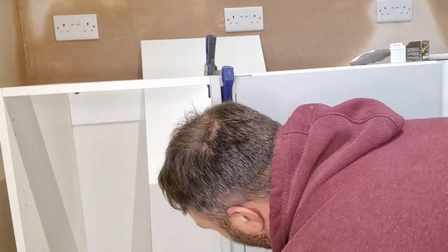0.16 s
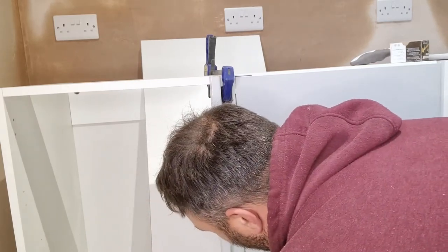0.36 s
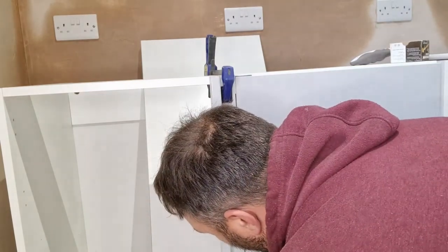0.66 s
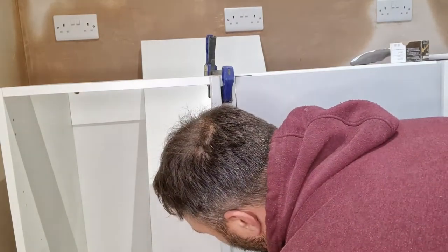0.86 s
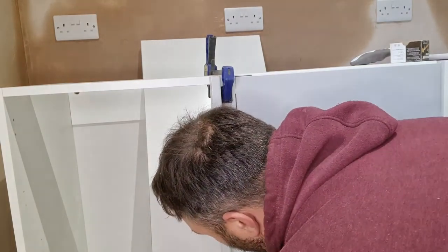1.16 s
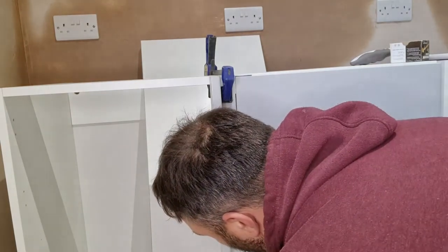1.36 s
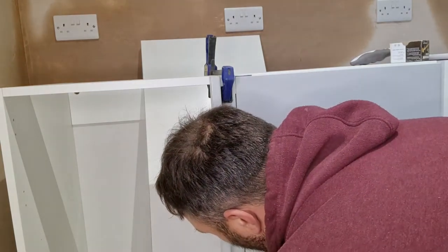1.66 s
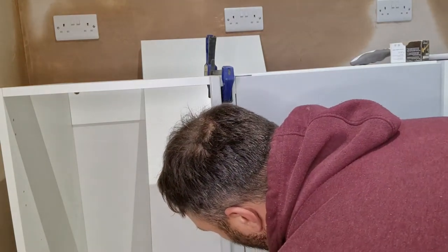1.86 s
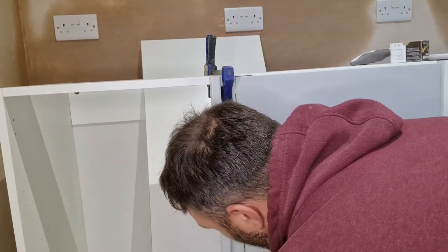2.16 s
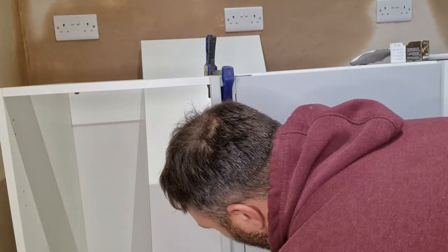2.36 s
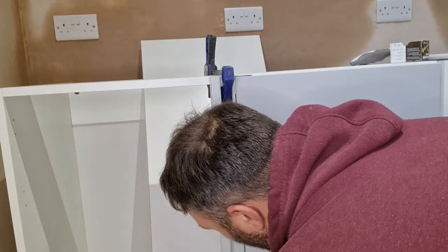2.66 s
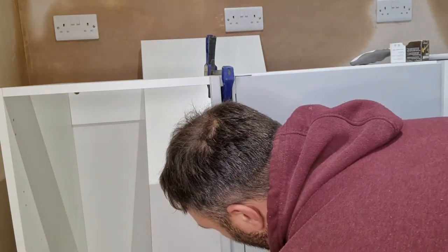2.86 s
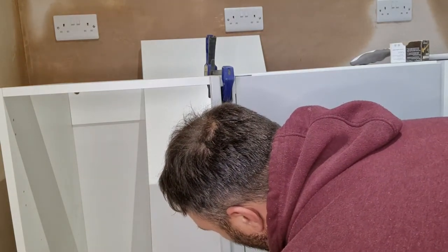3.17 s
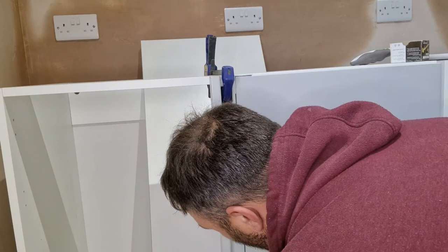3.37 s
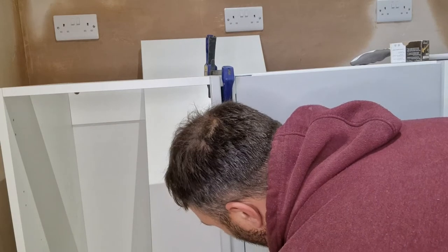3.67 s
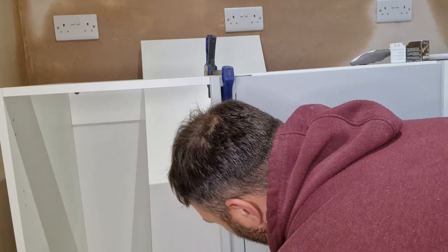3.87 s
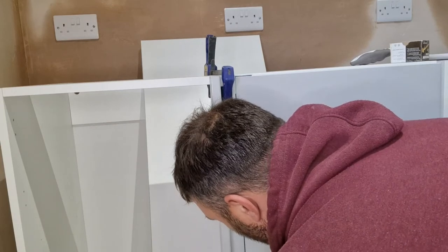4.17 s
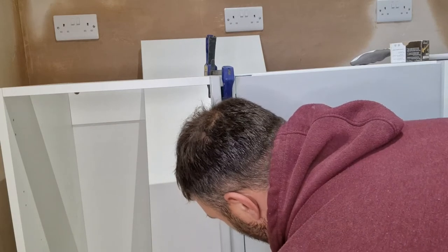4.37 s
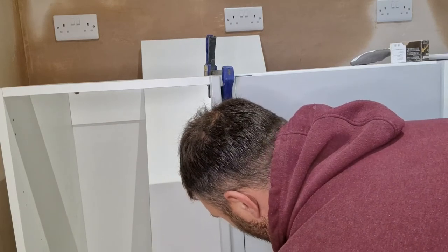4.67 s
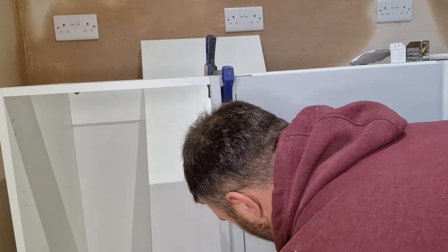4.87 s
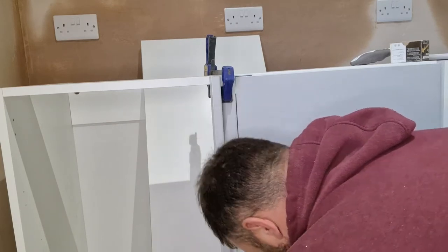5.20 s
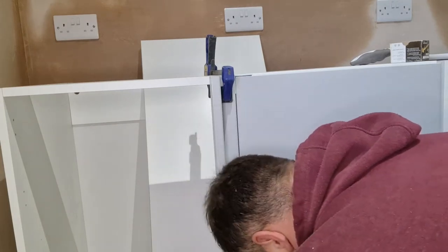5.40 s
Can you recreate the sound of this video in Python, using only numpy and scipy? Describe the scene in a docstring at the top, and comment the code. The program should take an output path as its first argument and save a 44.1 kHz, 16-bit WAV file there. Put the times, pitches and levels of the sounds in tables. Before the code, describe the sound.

Irregular hollow knocks and light metal clicks as a clamp is pumped tight on a kitchen cabinet in a quiet room.

```python
"""Rubbing strokes and hollow, booming knocks: a hand works a clamp tight on an empty kitchen cabinet.
Each stroke of the handle rubs, the jaws knock the panels and the steel parts tick, while the hollow
carcass booms on its lowest note in uneven swells. Skin or cloth brushes past on the left and
squeaks once near the end. The room is bare and quiet, heard through a microphone with two small ports."""
import sys
import numpy as np
from scipy import signal
from scipy.fft import rfft, irfft
from scipy.io import wavfile

SR = 44100
rng = np.random.default_rng(int(sys.argv[2]) if len(sys.argv) > 2 else 0)


def file_out(sig):
    """Save sig as 16-bit WAV at sys.argv[1]."""
    # one column per channel
    cols = np.atleast_2d(sig).T
    # limit, then scale
    lim = np.clip(cols, -1, 1)
    pcm = np.round(lim * 32767).astype(np.int16)
    wavfile.write(sys.argv[1], SR, pcm)


N = 244314

# modes of the cabinet panels: (frequency [Hz], level [dB], t60 [s])
PANEL_MODES = [(60, -19.5, 0.41), (99, -25.5, 0.92), (174.6, -9.5, 0.51), (232, -4, 0.11),
               (283.7, -5.5, 0.29), (360.6, -1.5, 0.083), (386.8, 0.5, 0.14), (550, -1, 0.22),
               (581, 1, 0.079), (739, -6, 0.091), (812, -6.5, 0.13), (1003, -9, 0.062), (1237, -16, 0.28),
               (1426, -7, 0.052), (1529, -12, 0.15), (1575, -3.5, 0.074), (1704, -18.5, 0.39),
               (2135, -21, 0.24)]
# modes of the steel clamp: (frequency [Hz], level [dB], t60 [s])
CLAMP_MODES = [(1260, -6, 0.089), (2092, -5.5, 0.064), (3170, -4, 0.061), (3990, -8.5, 0.072),
               (4296, 1.5, 0.039), (4690, -18, 0.018), (6000, -25.5, 0.012), (7980, -27, 0.052)]
OPPOSED = np.array([[1], [-1]])   # added on the left, subtracted on the right


def from_db(db):
    return 10 ** (np.asarray(db) / 20)


def rms_one(x):
    return x / np.sqrt(np.mean(x ** 2) + 1e-20)


def peak_one(x):
    return x / np.abs(x).max()


def filtered(x, order, hz, kind="low"):
    return signal.sosfilt(signal.butter(order, hz, kind, fs=SR, output="sos"), x)


def envelope(rows, rise_s, fall_s):
    """Gain over time: each row rises out of silence, slopes while it is held and dies away."""
    t, gain = np.arange(N) / SR, np.zeros(N)
    for start, length, db, sag_db in rows:
        times = [start - rise_s, start, start + length, start + length + fall_s]
        gain += from_db(np.interp(t, times, [db - 24, db, db - sag_db, db - sag_db - 23], -200, -200))
    return gain


def drift(rate_hz):
    """Smooth random wander of rms 1."""
    r = np.exp(-2 * np.pi * rate_hz / SR)
    return rms_one(signal.lfilter([1], [1, -2 * r, r * r], rng.standard_normal(N + SR))[SR:])


def coloured(x, spectrum):
    """Gives a white signal the spectrum; rms 1."""
    hz, db = np.transpose(spectrum)
    gain = from_db(np.interp(np.log(np.fft.rfftfreq(N, 1 / SR) + 1), np.log(hz), db))
    return rms_one(irfft(rfft(x) * gain, N))


def grains(per_s, spread_db):
    """Random micro-slips of uneven size."""
    sizes = from_db(spread_db * np.minimum(rng.exponential(1, N), 5)) * rng.choice([-1, 1], N)
    return sizes * (rng.random(N) < per_s / SR)


def ring(force, hz, t60):
    """One mode: a unit click sets a sine of height 1 ringing."""
    r, w = from_db(-60 / (t60 * SR)), 2 * np.pi * hz / SR
    return signal.lfilter([0, np.sin(w)], [1, -2 * r * np.cos(w), r * r], force + 1e-18)


def struck(modes, events, contacts, uneven_db):
    """Each contact force drives all modes with new strengths; the blow peaks at its event's level."""
    out, length = np.zeros(N + SR), SR // 2
    offsets_db = uneven_db * rng.standard_normal((len(events), len(modes)))
    for (start, peak_db, *_), contact, offsets in zip(events, contacts, offsets_db):
        force = np.pad(contact, (0, length - len(contact)))
        blow = sum(from_db(db + off) * ring(force, hz, t60) for (hz, db, t60), off in zip(modes, offsets))
        at = round(start * SR)
        out[at:at + length] += from_db(peak_db) * peak_one(blow)
    return out[:N]


def stereo_noise(samples, shared_hz):
    """Long waves reach both microphone ports alike, short ones differ."""
    common, apart = rng.standard_normal((2, samples))
    return common + filtered(apart, 1, shared_hz, "high") * OPPOSED


def room_tone():
    """Steady rumble and hiss of the quiet room."""
    # colour of the room tone: (frequency [Hz], relative level [dB])
    spectrum = [(18, -49), (30, -6.5), (145, -4.5), (244, -38), (458, -22.5), (611, -29.5), (679, -24.5),
                (837, -33), (1310, -31), (1650, -38), (2090, -33), (2450, -40.5), (3540, -38), (7800, -40),
                (9500, -61), (15800, -54)]
    return from_db(-62.5) * np.array([coloured(side, spectrum) for side in stereo_noise(N, 1400)])


def handle_strokes():
    """Dense slips hiss in the air and ring the clamp lightly and, through the jaws, the panels."""
    # pumps of the handle: (squeeze start [s], squeeze length [s], squeeze hiss [dB],
    # return start [s], return hiss [dB], rubbing in the panels against the hiss [dB])
    pumps = [(-.15, .05, -70, 0.005, -68, 1), (0.237, 0.056, -67, .32, -69, 2),
             (0.481, 0.12, -62.5, .718, -62.5, 1), (0.857, 0.14, -71, 1.1, -64, 9),
             (1.291, 0.11, -67.5, 1.46, -63, 5), (1.652, 0.068, -60.5, 1.735, -61.5, 4),
             (1.889, 0.11, -62, 2.04, -62, -1.5), (2.251, 0.044, -62, 2.407, -61.5, 3),
             (2.619, 0.047, -65, 2.79, -63.5, 5), (3.005, .048, -68, 3.165, -68, 4.5),
             (3.405, 0.03, -64, 3.52, -65, 2), (3.751, 0.051, -67, 3.903, -65, 2.5),
             (4.128, 0.052, -64.5, 4.295, -65, 1), (4.549, 0.045, -65.5, 4.685, -66, 3)]
    # colour of the rubbing: (frequency [Hz], relative level [dB])
    spectrum = [(590, -4.5), (1000, -7), (1330, -25.5), (1570, 2.5), (2290, -9), (4090, -5.5), (4530, -10),
                (5210, -6), (6870, -15), (7530, -8), (9380, -30.5), (11800, -29.5), (15800, -40)]
    edge_s, return_s = 0.028, 0.075
    t, air, jaws = np.arange(N) / SR, np.zeros(N), np.zeros(N)

    def swell(start, length):
        return np.clip(np.minimum(t - start, start + length - t) / edge_s + .5, 0, 1) ** 2

    def panels(force):
        return sum(from_db(db + 0.91 * np.log2(hz / 500)) * ring(force, hz, t60)
                   for hz, db, t60 in PANEL_MODES[2:])

    for start, length, squeeze_db, return_start, return_db, panel_db in pumps:
        squeeze = from_db(squeeze_db) * swell(start, length)
        release = from_db(return_db) * swell(return_start, return_s)
        air += squeeze + release
        jaws += from_db(panel_db) * (squeeze + from_db(-2) * release)   # the return presses less
    slips = grains(per_s=9000, spread_db=2.0) * from_db(2.28 * drift(23))
    steel = sum(from_db(db) * ring(slips, hz, 6 * t60) for hz, db, t60 in CLAMP_MODES[2:])
    hiss = coloured(slips, spectrum) * from_db(0.55 * drift(70))
    return air * (hiss + from_db(-18) * rms_one(steel)) + panels(jaws * slips) / panels(slips).std()


def carcass_boom():
    """The cabinet's lowest note booms in uneven swells, its pitch wavering slightly."""
    # swells of the boom: (start [s], length [s], level [dB], sag over the length [dB])
    swells = [(0.0, 0.34, -57, 24), (.545, 0.14, -35.5, 1.5), (.775, 0.079, -46, 3), (.925, .175, -33, 5),
              (1.165, 0.17, -34.5, 9), (1.37, .075, -44, -4), (1.5, 0.14, -48.5, 5.5),
              (1.685, 0.079, -46.5, -7.5), (1.815, 0.13, -46.5, -3.5), (1.99, 0.086, -41.5, -1.5),
              (2.155, 0.1, -42.5, -0.5), (2.31, 0.25, -58.5, 8), (2.84, 0.054, -62.5, -9),
              (3.115, .21, -38, 9), (3.415, .035, -46, 0), (3.525, 0.26, -39.5, 21.5),
              (3.775, 0.02, -50, -5), (3.895, 0.11, -43.5, 12), (4.16, .08, -45, -0.5),
              (4.28, 0.12, -49, 2), (4.565, 0.21, -37.5, 17), (4.955, 0.094, -46.5, 10.5),
              (5.37, 0.086, -54.5, -1.5)]
    note_hz, waver_hz = 128.7, 3.77
    skew_rad = 0.051   # the note reaches the two ports slightly out of step
    hz = note_hz + waver_hz * drift(9.05)
    gain = envelope(swells, rise_s=0.039, fall_s=0.047) * from_db(3.2 * drift(41))
    return gain * np.sin(2 * np.pi * np.cumsum(hz) / SR + skew_rad * OPPOSED)


def steel_ticks():
    """Steel on steel: a brief force rings the clamp, with a dry snap and a thin crack on top."""
    # ticks of the steel parts: (time [s], level [dB], extra gain of the crack [dB])
    ticks = [(0.22, -55, -34), (0.5757, -41.5, -27.5), (0.9805, -40, -26), (1.3463, -36, -38),
             (1.5975, -59, 17), (1.6882, -32, -20), (1.976, -40, -33), (2.2884, -44, -34), (2.684, -74, 21),
             (5.02, -56.5, 2), (5.2952, -66.5, 4)]
    t, noise = np.arange(SR // 50) / SR, rng.standard_normal((len(ticks), 3, SR // 50))
    contacts = noise[:, 0] * np.exp(-t / 0.003)
    out = from_db(-6) * struck(CLAMP_MODES, ticks, contacts, uneven_db=2.5)
    for (start, db, crack_db), (_, crack_noise, snap_noise) in zip(ticks, noise):
        snap = filtered(snap_noise * np.exp(-t / 0.0016), 2, [3280, 4970], "band")
        crack = filtered(crack_noise * np.exp(-t / 0.001), 4, 9500, "high")
        at = round(start * SR)
        out[at:at + len(t)] += from_db(db) * (peak_one(snap) + from_db(crack_db) * crack)
    return out


def jaw_knocks():
    """A jaw lands as a short rattle of dying force; harder contact reaches higher and crunches more."""
    # knocks on the panels: (time [s], level [dB], hardness [octaves above softest], force decay [s])
    knocks = [(0.226, -44.5, 3, 0.0083), (0.525, -25.5, 1.74, 0.0097), (0.898, -32, 0.26, 0.016),
              (0.915, -33.5, 0.33, 0.041), (1.04, -46.5, 5.2, 0.0056), (1.142, -28.5, 0.81, 0.01),
              (1.395, -48, 1.5, 0.026), (1.647, -42.5, 0.57, 0.053), (1.738, -42, 2.7, 0.0049),
              (1.808, -31, 0.36, 0.0079), (1.959, -39, 0.6, 0.022), (2.123, -35.5, 0.32, 0.019),
              (2.256, -42.5, 0.67, 0.019), (2.741, -54, 1.7, 0.017), (3.096, -38.5, 0.3, 0.019),
              (3.113, -42.5, 2.8, 0.0031), (3.37, -50.5, 1.9, 0.016), (3.485, -42.5, 3.15, 0.0081),
              (3.517, -73, 1.2, 0.005), (3.848, -50, 1.4, 0.01), (4.239, -55.5, 2.2, 0.012),
              (4.57, -49, 0.76, 0.015), (4.631, -46.5, 1.34, 0.005), (4.884, -52.5, 0.51, 0.037)]
    softest_hz, landing_s = 290, 0.0033
    t, contacts = np.arange(SR // 10) / SR, []
    for _, _, hardness, decay_s in knocks:
        force = rng.standard_normal(len(t)) * np.exp(-t / decay_s) * (1 - np.exp(-t / landing_s))
        contacts.append(filtered(force, 2, softest_hz * 2 ** min(hardness, 5)))
    out = from_db(-1) * struck(PANEL_MODES, knocks, contacts, uneven_db=2.0)
    for (start, db, hardness, _), contact in zip(knocks, contacts):
        crack = filtered(np.diff(contact, prepend=0), 2, 2800)   # sudden changes of force radiate directly
        thud = filtered(contact, 2, [165, 436], "band")          # the whole panel gives way
        crunch = filtered(contact, 2, [726, 2200], "band")       # the board crunches
        at = round(start * SR)
        for part, part_db in [(crack, -16.5), (thud, -4), (crunch, -13.5 + 3 * hardness)]:
            out[at:at + len(t)] += from_db(db + part_db) * peak_one(part)
    return out


def cloth_brush():
    """Skin or cloth slides past in short sweeps of fine-grained, bright rubbing."""
    # sweeps: (start [s], length [s], relative level [dB], sag over the length [dB])
    sweeps = [(.52, 0.069, -85.5, 2), (1.45, 0.029, -76.5, 5), (1.595, 0.016, -70, 4.5),
              (2.69, 0.032, -75, 5), (4.85, 0.055, -66.5, 2), (5.02, 0.13, -73.5, 6.5)]
    # colour of the brushing: (frequency [Hz], relative level [dB])
    spectrum = [(710, -43), (1200, -18), (1750, -11), (1850, -32), (1990, -14.5), (2580, -17.5),
                (3300, -6.5), (6240, -10), (7260, -8.5), (9300, -24.5), (15800, -9.5)]
    rubbing = coloured(grains(per_s=16000, spread_db=4.5), spectrum)
    return envelope(sweeps, rise_s=0.04, fall_s=0.046) * from_db(8.5) * rubbing


def cloth_squeak():
    """Stretching cloth gives one rough tone that wavers about a nearly steady pitch."""
    # the squeak: (start [s], length [s], level [dB], sag over the length [dB])
    squeaks = [(4.825, 0.056, -67, -5)]
    waver_hz, rough_db, jitter_hz = 110, 5, 150
    t, start = np.arange(N) / SR, squeaks[0][0]
    hz = np.interp(t, [start, start + 0.0305], [1900, 1890]) + waver_hz * drift(jitter_hz)
    gain = envelope(squeaks, rise_s=0.036, fall_s=0.019) * from_db(rough_db * drift(jitter_hz))
    return gain * np.sin(2 * np.pi * np.cumsum(hz) / SR)


def bare_room(x):
    """Direct sound plus reflections from bare walls and the open carcass; the treble dies first."""
    low_t60_s, treble_t60_s = 0.52, 0.26
    t, spray = np.arange(SR // 2) / SR, stereo_noise(SR // 2, shared_hz=690)
    low = filtered(spray, 1, 3600)
    tail = low * from_db(-60 * t / low_t60_s) + (spray - low) * from_db(-60 * t / treble_t60_s)
    tail *= 1 - np.exp(-t / 0.0005)
    tail /= np.sqrt(np.sum(tail ** 2) / 2)
    return x + from_db(-1.02) * signal.fftconvolve(x[None], tail, axes=1)[:, :N]


def surface_width(x):
    """Rubbing is spread over a surface: its short waves differ between the ports."""
    lags = (rng.uniform(0.00014, .004, 6) * SR).astype(int)
    apart = sum(np.roll(x, lag) * (-1) ** k for k, lag in enumerate(lags)) / np.sqrt(6)
    return from_db(-1.5) * filtered(apart, 2, 905, "high") * OPPOSED


def scene():
    """Clamp and cabinet stand centred before the microphone; the brushing lies to the left."""
    rub = handle_strokes()
    cloth = cloth_brush() + cloth_squeak()
    cabinet = bare_room(jaw_knocks() + steel_ticks() + rub) + surface_width(rub) + carcass_boom()
    brushing = (bare_room(cloth) + surface_width(cloth)) * from_db(2.5 * OPPOSED)
    return cabinet + brushing + room_tone()


def record(dry):
    """The small ports lose the deepest bass and the left one hears more treble; the top is cut steeply."""
    wet = filtered(dry, 4, 43, "high")
    wet += filtered(wet, 1, 1500, "high") * (from_db(1.23 * OPPOSED) - 1)
    return signal.sosfilt(signal.ellip(12, .5, 75, 15800, fs=SR, output="sos"), wet)


dry = scene()
out = record(dry)
file_out(out)
```